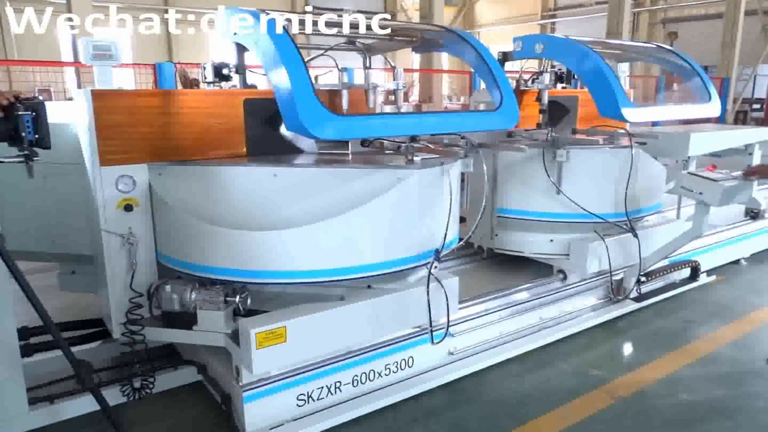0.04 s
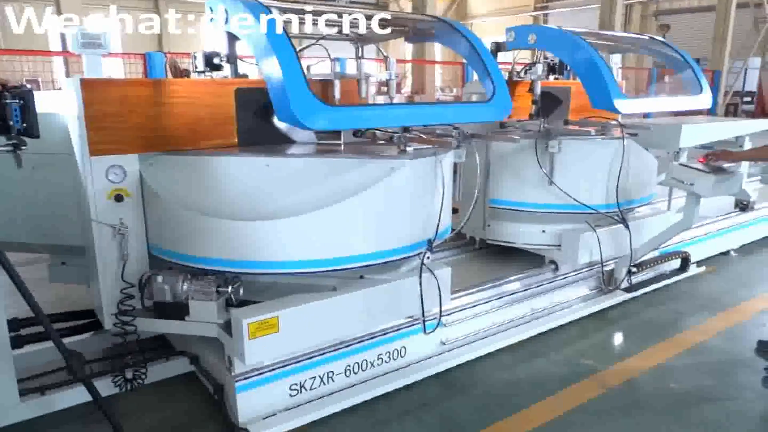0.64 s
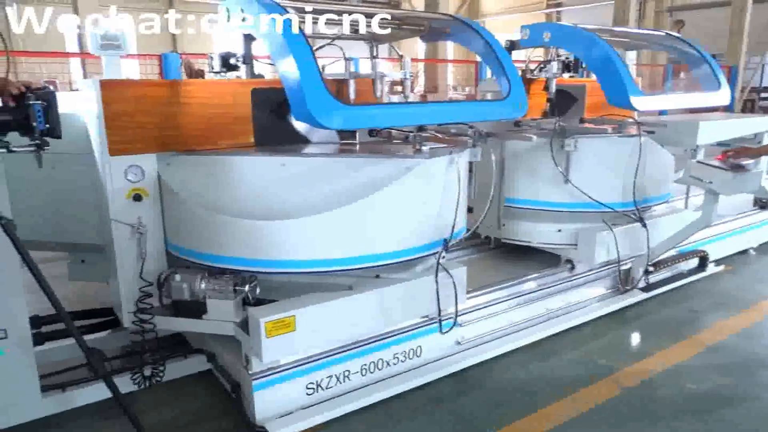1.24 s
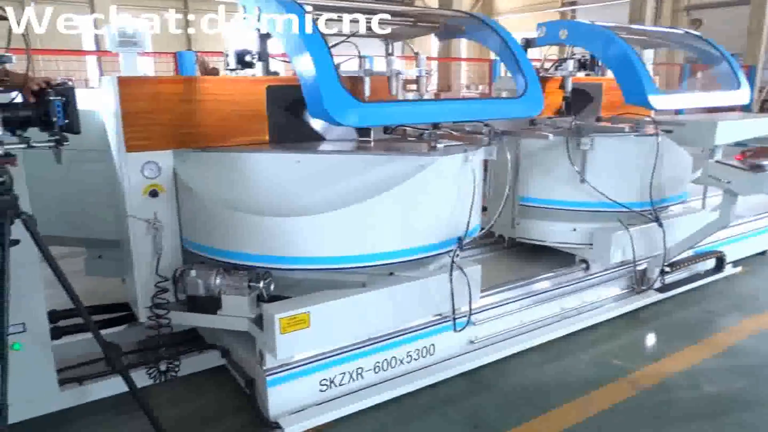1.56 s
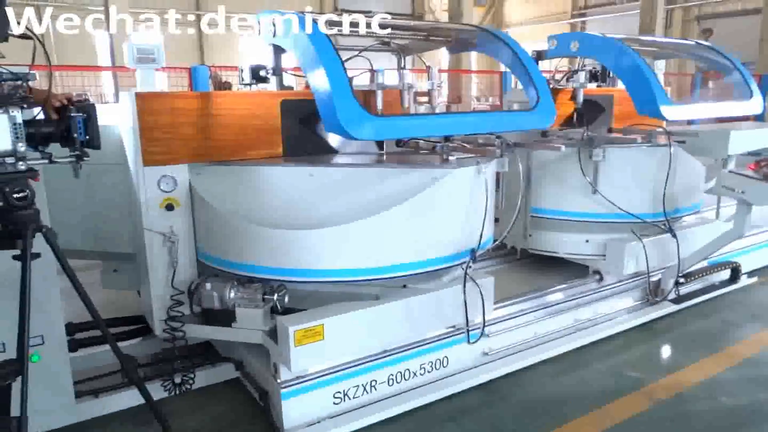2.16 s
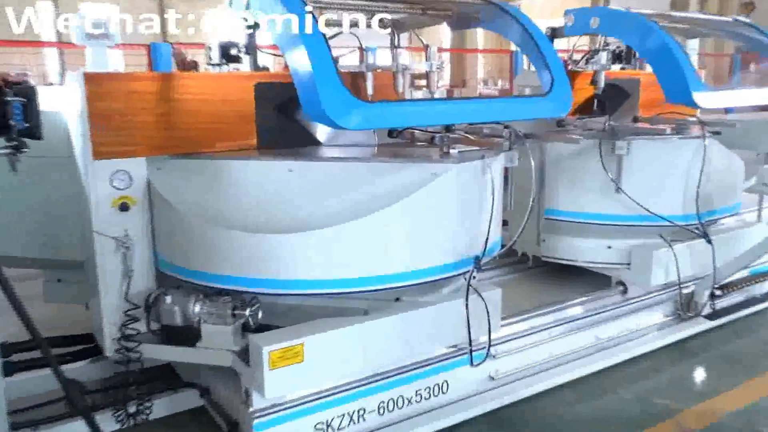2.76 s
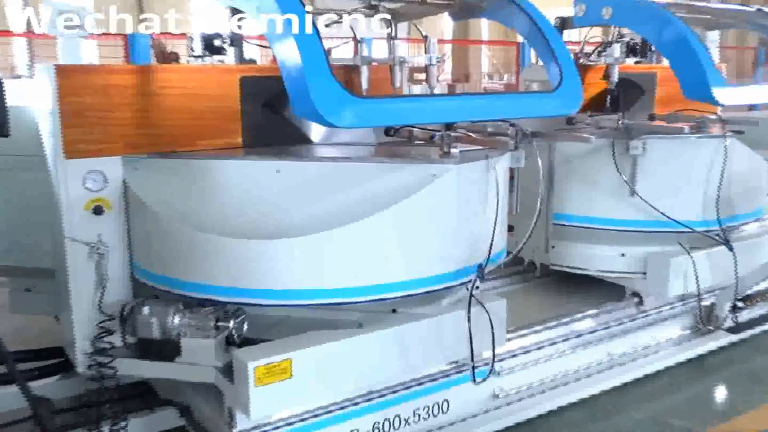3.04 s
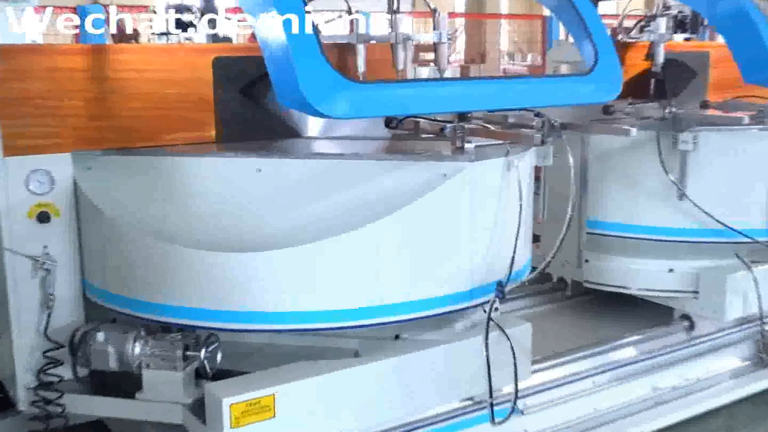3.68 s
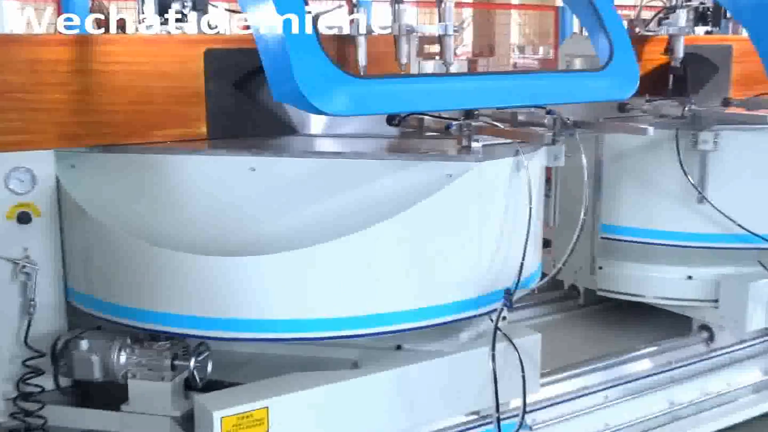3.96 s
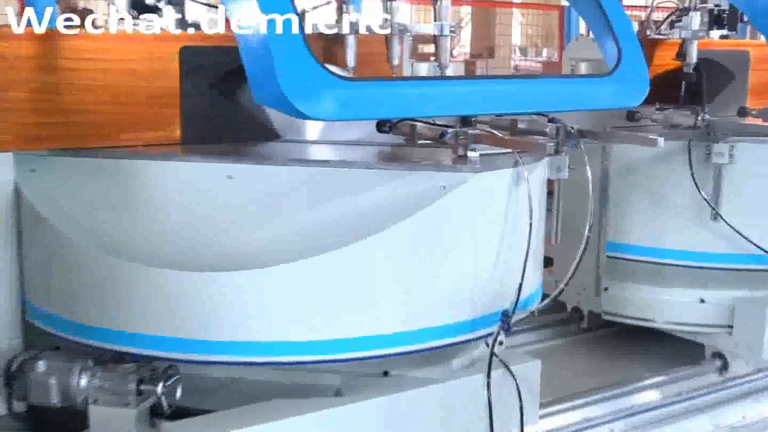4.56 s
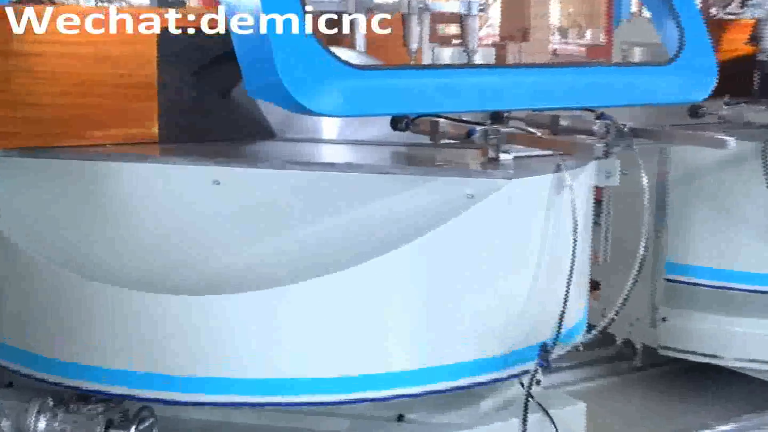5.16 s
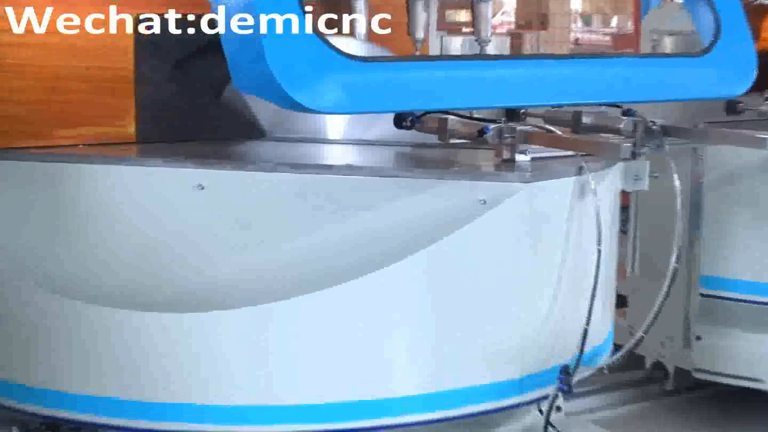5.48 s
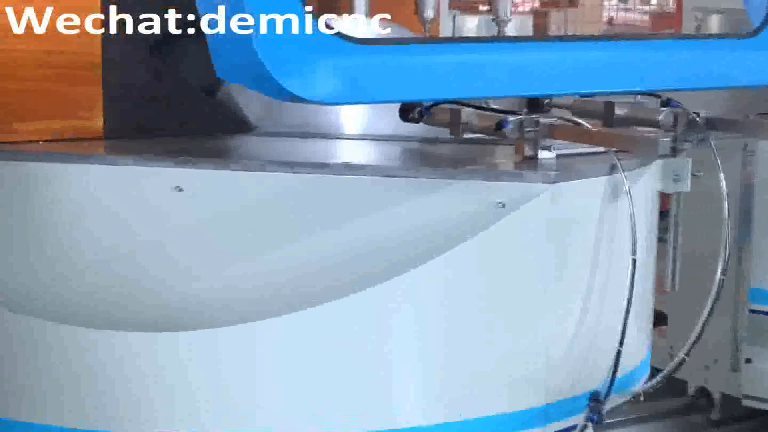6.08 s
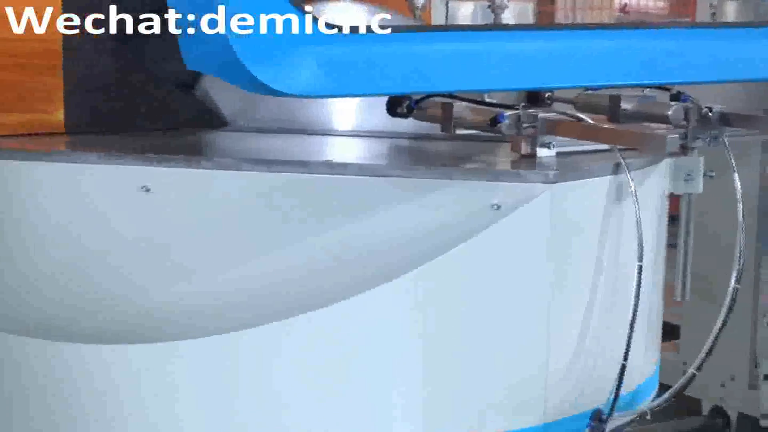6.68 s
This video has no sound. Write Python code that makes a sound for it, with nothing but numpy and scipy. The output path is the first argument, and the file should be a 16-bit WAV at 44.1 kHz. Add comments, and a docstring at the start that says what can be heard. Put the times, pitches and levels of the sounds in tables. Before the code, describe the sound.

A large twin saw cuts metal with a shrill, hissing screech, then keeps whining and whirring in a factory hall.

```python
"""A factory hall: a double-head mitre saw cuts aluminium, then runs free as the listener walks up to it.
Turbulent air rushes from the fans and round the blades, and the motors hum. Two blades whine at their
tooth rates and beat against each other; they slow under load and speed up once clear. In the cut, torn
chips hiss and the profile chatters at its resonances, modulating the whine into a screech.
The hall adds a diffuse reverberant tail."""
import sys
import numpy as np
from scipy import signal
from scipy.fft import rfft, irfft
from scipy.io import wavfile
from scipy.ndimage import map_coordinates

SR = 44100
rng = np.random.default_rng(int(sys.argv[2]) if len(sys.argv) > 2 else 0)


def bounce(signal):
    """Save signal as a 16-bit WAV file at the path given by the first command-line argument."""
    frames = np.transpose(np.atleast_2d(signal))
    limited = np.clip(frames, -1, 1)
    pcm = np.round(limited * 32767).astype(np.int16)
    wavfile.write(sys.argv[1], SR, pcm)


N = 300762

# Levels in the tables are relative: each source adds its own gain.
# Difference between the microphones in the hall: frequency_hz, side_gain_db
SIDE_SPECTRUM = [(60, -28), (110, -16), (200, -24), (380, -13.5), (1290, -15), (2380, -15.5), (4400, -22),
                 (8100, -19.5), (15000, -20)]
# Broad noise surges with the chips in the cut, then grows as the listener nears:
# time_s, low_band_db, high_band_db
NOISE_GAINS = [(0, -8, -4), (.37, -3.5, -1.5), (1.05, -10, -6), (1.6, -4, -2.5), (2.0, -7, -4),
               (2.35, -2, -3.5), (3.2, 1, -0.9), (4.2, 3, 3.5), (5.3, 7, 5.5), (6.3, 10, 9.5),
               (6.55, 11.5, 9.5), (6.82, 15.5, 12.5)]
# Turbulence of the fans: frequency_hz, density_db
FAN_SPECTRUM = [(25, -32), (50, -26), (75, -14.5), (130, -9.5), (185, -3.5), (225, -3.5), (330, 3),
                (480, -5.5), (850, -2), (1300, -6), (2000, -11.5), (4000, -20)]
# Turbulence round the blades: frequency_hz, density_db
RUSH_SPECTRUM = [(600, -14), (1600, -19.5), (2200, -5.5), (2900, 0), (3700, -4.5), (4700, -8.5),
                 (5800, -4.5), (7000, -2), (8300, -4), (10500, -8.5), (13000, -18), (15500, -25)]
# Motor and cabinet tones: pitch_hz, level_db
HUM_TONES = [(97, -27), (182, -11), (403, -20), (455, -36), (554, -12), (759, -18), (1034, -17.5)]
# Brief tones that swell and fade in the noise: peak_s, half_length_s, pitch_hz, level_db
BRIEF_TONES = [(2.38, .17, 196.6, -54), (2.55, 0.48, 274.3, -57.5), (6.6, 0.43, 1035, -47),
               (6.726, 0.082, 392, -40)]
# Hiss of teeth tearing off chips: time_s, level_db
CHIP_LEVELS = [(0.0, -33.5), (0.5, -32.5), (0.51, -33.5), (1.25, -36.5), (1.62, -32.5), (1.92, -40),
               (2.2, -38), (2.55, -41), (2.7, -40)]
# Spectrum of that hiss: frequency_hz, density_db
CHIP_SPECTRUM = [(250, -62), (500.0, -34), (1000.0, -15), (2000.0, -13), (3000.0, -18), (4300.0, -11),
                 (5000.0, -4), (6000.0, -0.5), (7200.0, 2), (8500.0, 1.5), (10000.0, -10), (12000.0, -2),
                 (14000.0, -8.5), (15500, -44)]
# Broad resonance of the profile, stirred by the chips: frequency_hz, density_db
GROWL_SPECTRUM = [(490, -40), (540, -27), (560, 9), (585, -5), (612, -5.5), (650, -10), (710, -23)]
# The profile's resonances shift as the cut deepens: time_s, near_end_hz, far_end_hz
PROFILE_RESONANCES = [(.55, 585.7, 635), (.85, 563.7, 581.4), (1.25, 548.5, 568.8), (1.68, 546.8, 567.3),
                      (1.9, 562, 605), (2.1, 584, 615.3), (2.35, 603.7, 570), (3.5, 604, 556.6)]
# Bursts of chatter, with the whine's two lower and two upper sidebands:
# peak_s, half_length_s, drone_db, octave_db, lower_2_db, lower_1_db, upper_1_db, upper_2_db
CHATTER_BURSTS = [(0.373, 0.14, -50, -45.5, -34.5, -39, -25.5, -39),
                  (0.718, 0.076, -35.5, -45.5, -40, -32.5, -29, -37),
                  (0.835, 0.1, -43, -49, -46, -40, -22.5, -35),
                  (1.116, .13, -37.5, -60, -50, -24, -31, -33.5),
                  (1.361, 0.13, -42.5, -51, -36, -23.5, -26.5, -41),
                  (1.593, 0.12, -36.5, -51, -38, -28, -23.5, -27),
                  (1.894, 0.099, -58, -58, -39.5, -40, -31.5, -42),
                  (2.135, .11, -42, -42.5, -34.5, -34, -30, -30.5),
                  (2.36, 0.1, -36.5, -58, -45, -37, -45, -35)]
# The low drone trembles between bursts and rings out: start_s, end_s, fade_db_per_s, level_db
DRONE_TREMBLE = (1, 3, 10.5, -44)
# Weaker sidebands, against the mean of the main four: tooth_pair_multiple, chatter_multiple, level_db
WEAK_SIDEBANDS = [(2, -3, -37), (2, 3, -47), (2, 5, -19), (3, 1, -14), (4, -3, -31), (4, -2, -6.5),
                  (4, -1, -18), (4, 1, -27), (4, 2, -13)]
# Tooth rate of each head and its sag under load:
# free_hz, entry_sag_hz, cutting_sag_hz, settle_s, breakthrough_sag_hz, clear_s, recover_s
NEAR_HEAD = (6461, 223, 113, .8, 215, 3.05, .44)
FAR_HEAD = (6474, 133, 104, .5, 191, 2.92, .62)
# Whine at 1 to 5 times the tooth-pair rate, before and after the deepest bite and running free:
# near_bite_db, far_bite_db, rise_db_per_s, fade_db_per_s, free_db, high_band_gain_share
WHINE_PARTIALS = [(-56.5, -59, -14, 11, -47, 0.45), (-16, -27.5, -1.5, 0.8, -37, 0.85),
                  (-23.5, -38, 5, 17, -53, 0.51), (-21.5, -29.5, 6.5, 9.5, -54.5, 0.27),
                  (-48, -70, -3, 4.5, -80, .1)]
# The blades squeal on one partial: start_s, end_s, partial_number, near_db, far_db
BLADE_SQUEALS = [(0.305, 0.37, 1, -36, -41), (.68, 0.757, 1, -41.5, -55), (1.078, 1.617, 1, -43.5, -58),
                 (1.507, 1.7, 3, -32.5, -35), (1.786, 2.03, 2, -17, -29.5), (1.99, 2.12, 4, -30.5, -38),
                 (2.48, 2.73, 4, -32.5, -44), (2.635, 2.76, 3, -45, -28.5), (2.635, 2.801, 1, -31, -37),
                 (2.8, 2.945, 3, -34, -40), (2.853, 3.45, 1, -40, -39.5), (4.15, 4.98, 4, -54, -52),
                 (4.481, 4.637, 1, -48, -35.5), (5.2, 5.36, 1, -48, -36), (5.401, 5.54, 1, -47, -31.5),
                 (6.33, 6.82, 4, -50, -51)]

TEETH = 130
HALL_T60_S, CUTOFF_HZ, FLOOR_DB = 1.38, 15700, -120
FAN_DB, RUSH_DB, HUM_DB = -47.5, -35, -51
RUMBLE_FULL_S, RUMBLE_DB = 5.6, -63
RING_HZ, RING_START_S, RING_END_S = 787, 0.43, 2.1
TREMBLE_RISE_DB_PER_S = 52
BITE_S, BREAKTHROUGH_S, BREAKTHROUGH_DRAG_S, CUT_END_S = 0.9, 2.62, 0.28, 2.93
SING_S, SING_RISE_S, SING_GAIN_DB = 4.12, 0.077, 7   # the free blades sing out when nearly up to speed
FIRST_NODE_S, LAST_NODE_S, NODE_SPACING_S, NODE_DB = 4.49, 6, 0.316, 3
WHINE_LOSS_DB = 9   # the strongest screech takes this much from the tooth-rate partial


def from_db(db):
    """Amplitude grows tenfold for every 20 decibels."""
    return 10 ** (np.asarray(db) / 20)


def unit_rms(x):
    """Normalisation to a mean power of 1."""
    return x / np.sqrt(np.mean(x ** 2) + 1e-20)


def clock():
    """Uniform sampling: the time of every sample in seconds."""
    return np.arange(N) / SR


def in_time(rows):
    """Linear interpolation in time, one curve per column."""
    times_s, *columns = np.transpose(rows)
    return [np.interp(clock(), times_s, column) for column in columns]


def held(start, end, rise, fall):
    """Exponential growth and decay about a plateau at 0 dB; times in s, slopes in dB per second."""
    return -rise * np.maximum(start - clock(), 0) - fall * np.maximum(clock() - end, 0)


def swell(peak_s, half_s):
    """A Gaussian envelope, in dB."""
    return -10 * np.log10(np.e) * ((clock() - peak_s) / half_s) ** 2


def power_sum(levels):
    """Incoherent addition: the level in dB of sounds whose powers add."""
    return 10 * np.log10(sum(10 ** (np.maximum(db, FLOOR_DB) / 10) for db in levels))


def drift(corner_hz):
    """Low-passed noise gives a slow random fluctuation of rms 1."""
    step, run_in = 40, 2000
    pole = np.exp(-2 * np.pi * corner_hz * step / SR)
    noise = rng.standard_normal(N // step + run_in + 2)
    slow = signal.lfilter([1], [1, -2 * pole, pole * pole], noise)[run_in:]
    return np.interp(np.arange(N) / step, np.arange(len(slow)), unit_rms(slow))


def cycles(hz):
    """Phase, in cycles, is the integral of frequency."""
    return np.cumsum(hz * np.ones(N)) / SR


def tone(phase):
    """Simple harmonic motion of rms 1 with a random starting phase."""
    return np.sqrt(2) * np.sin(2 * np.pi * (phase + rng.random()))


def each_turn(tooth_phase, points):
    """Rotation makes an uneven pattern round the blade's rim periodic; rms 1."""
    rim_position = (tooth_phase / TEETH) % 1 * points
    pattern = rng.standard_normal(points)
    return unit_rms(map_coordinates(pattern, [rim_position], order=3, mode="grid-wrap"))


def filtered(x, spectrum):
    """Filtering multiplies the spectrum by a gain curve, here falling 12 dB an octave beyond its ends."""
    hz, level_db = np.transpose(spectrum)
    bins_hz = np.maximum(np.arange(N // 2 + 1) * SR / N, 1)
    below = np.minimum(bins_hz / hz[0], 1) ** 2
    above = np.minimum(hz[-1] / bins_hz, 1) ** 2
    gain = from_db(np.interp(np.log(bins_hz), np.log(hz), level_db))
    return irfft(rfft(x) * below * above * gain, N)


def coloured_noise(spectrum):
    """Filtered white noise takes on the filter's spectrum; rms 1."""
    return unit_rms(filtered(rng.standard_normal(N), spectrum))


def hall(x, delay_s):
    """Reverberation: a diffuse field decays exponentially from the first wall echo on."""
    t = np.arange(int(HALL_T60_S * SR)) / SR
    tail = rng.standard_normal(len(t)) * from_db(-60 * t / HALL_T60_S) * (t > delay_s)
    return signal.fftconvolve(x, tail / np.sqrt(np.sum(tail ** 2)))[:N]


def unbalance(tooth_hz):
    """Rotating unbalance forces one vibration a turn, a rumble that grows towards the machine."""
    level_db = RUMBLE_DB + held(RUMBLE_FULL_S, RUMBLE_FULL_S, rise=8, fall=0)
    return from_db(level_db) * (1 + 0.89 * drift(8)) * tone(cycles(tooth_hz) / TEETH)


def air(level_db, spectrum, gust_db):
    """Turbulence radiates broadband noise of slightly uneven strength."""
    return from_db(level_db + gust_db * drift(2.2)) * coloured_noise(spectrum)


def wavering_tone(hz, level_db, waver_db, waver_hz):
    """Slow amplitude and frequency modulation make a tone waver."""
    return from_db(level_db + waver_db * drift(5.9)) * tone(cycles(hz + waver_hz * drift(9.0)))


def brief_tones():
    """Tones swell and fade under Gaussian envelopes; one near 390 Hz flickers in the noise at the end."""
    return sum(wavering_tone(hz, db + swell(peak_s, half_s), waver_db=2, waver_hz=6)
               for peak_s, half_s, hz, db in BRIEF_TONES)


def motors(gain_db):
    """Motor and cabinet tones superpose into a hum."""
    tones = sum(wavering_tone(hz, db, waver_db=4, waver_hz=1.82) for hz, db in HUM_TONES)
    return from_db(HUM_DB + gain_db) * tones


def chips(near_hz, far_hz):
    """Periodic and random noise: each tooth tears its own way, turn after turn, and loose chips hiss."""
    near, far = (each_turn(cycles(hz), points=800) for hz in (near_hz, far_hz))
    loose = rng.standard_normal(N)
    tearing = near + from_db(-2) * far + from_db(-1) * loose
    # the hiss dies away once the teeth leave the metal
    level_db = in_time(CHIP_LEVELS)[0] + 7 + held(0, CHIP_LEVELS[-1][0], rise=0, fall=31)
    return from_db(level_db) * unit_rms(filtered(tearing, CHIP_SPECTRUM))


def ring(tooth_hz):
    """A higher resonance of the machine frame, strongest early in the cut, also modulates the whine."""
    envelope_db = held(RING_START_S, RING_START_S, rise=TREMBLE_RISE_DB_PER_S, fall=4.5)
    envelope_db += held(0, RING_END_S, rise=0, fall=44.3)
    teeth = cycles(tooth_hz)
    swing = cycles(RING_HZ * (1 + 0.0067 * drift(9.3)))
    upper = tone(teeth + swing) + from_db(-14) * tone(teeth + 2 * swing)
    # the sidebands below the whine last as long as the cut
    lower_db = -47.5 + held(0, BREAKTHROUGH_S, rise=0, fall=20)
    lower = from_db(lower_db) * (tone(teeth - swing) + tone(teeth - 2 * swing))
    return from_db(envelope_db) * (from_db(-56) * tone(swing) + from_db(-55) * upper) + lower


def drone(tooth_hz, chatter_hz, drone_db, octave_db, jitter, shake, third_db):
    """One end of the profile vibrates at its resonance, shaken unevenly by every turn of the blade."""
    swing = cycles(chatter_hz * (1 + jitter * drift(20.33)))
    shaking = 1 + shake * (each_turn(cycles(tooth_hz), points=4) + drift(6.3))
    overtones = tone(2 * swing) + from_db(third_db) * tone(3 * swing)
    return shaking * (from_db(drone_db) * tone(swing) + from_db(octave_db) * overtones)


def screech(tooth_hz, chatter_hz, sidebands_db, jitter, runout):
    """Modulation: the profile swings against the teeth, giving sum and difference frequencies."""
    teeth = cycles(tooth_hz)
    swing = cycles(chatter_hz * (1 + jitter * drift(25.3)))
    main = sum(from_db(db) * tone(teeth + k * swing) for k, db in zip((-2, -1, 1, 2), sidebands_db))
    weak = sum(from_db(db) * tone(pairs * teeth / 2 + k * swing) for pairs, k, db in WEAK_SIDEBANDS)
    wobble = 1 + runout * each_turn(teeth, points=10)
    return wobble * (main + from_db(np.mean(sidebands_db, axis=0)) * weak)


def chatter_levels():
    """Powers add: levels in dB of the drone, its octave and the four sidebands of the screech."""
    start_s, end_s, fade, level_db = DRONE_TREMBLE
    tremble_db = level_db + held(start_s, end_s, TREMBLE_RISE_DB_PER_S, fade)
    between_bursts = [tremble_db, tremble_db - 17] + [FLOOR_DB] * 4   # the screech comes only in bursts
    bursts = [np.add.outer(levels, swell(peak_s, half_s)) for peak_s, half_s, *levels in CHATTER_BURSTS]
    return [power_sum(parts) for parts in zip(between_bursts, *bursts)]


def chatter(near_hz, far_hz, drone_db, octave_db, sidebands_db):
    """Cutting excites the profile's resonances: both ends drone and screech, and chips stir a growl."""
    near_end_hz, far_end_hz = in_time(PROFILE_RESONANCES)
    near = drone(near_hz, near_end_hz, drone_db, octave_db, jitter=0.00722, shake=0.18, third_db=-6)
    far = drone(far_hz, far_end_hz, drone_db, octave_db, jitter=0.01105, shake=0.26, third_db=-5.5)
    drones = from_db(-2) * near + from_db(-7.5) * far
    growl = from_db(drone_db - 9) * coloured_noise(GROWL_SPECTRUM)
    near_screech = from_db(0.5) * screech(near_hz, near_end_hz, sidebands_db, jitter=0.006, runout=0.054)
    far_screech = from_db(-8) * screech(far_hz, far_end_hz, sidebands_db, jitter=0.0097, runout=0.47)
    return drones + growl + near_screech + far_screech


def tooth_rate(free_hz, entry_sag_hz, cutting_sag_hz, settle_s, breakthrough_sag_hz, clear_s, recover_s):
    """Load slows a motor: it sags on entry, settles, is dragged down at breakthrough, then recovers."""
    t = clock()
    sag_hz = cutting_sag_hz + (entry_sag_hz - cutting_sag_hz) * np.exp(-t / settle_s)
    sag_hz += (breakthrough_sag_hz - sag_hz) * np.clip((t - BREAKTHROUGH_S) / BREAKTHROUGH_DRAG_S, 0, 1)
    return free_hz - sag_hz * np.exp(-np.maximum(t - clear_s, 0) / recover_s)


def standing_waves():
    """Interference: the whine dips and rises, in dB, as the listener passes nodes at an even pace."""
    t = clock()
    inside = np.clip(np.minimum(t - FIRST_NODE_S, LAST_NODE_S - t) / NODE_SPACING_S + 1, 0, 1)
    return -NODE_DB * inside * np.cos(2 * np.pi * (t - FIRST_NODE_S) / NODE_SPACING_S)


def whine_levels(high_band_db, screech_db):
    """Cutting, free running and squealing add in power: the level in dB of each partial of both blades."""
    near, far = [], []
    release_db = held(0, CUT_END_S, rise=0, fall=144)   # the teeth leave the metal
    sing_onset = np.clip((clock() - SING_S) / SING_RISE_S, 0, 1)
    singing_db = standing_waves() + SING_GAIN_DB * (sing_onset - 1)
    loss_db = WHINE_LOSS_DB * from_db(screech_db - screech_db.max()) ** 2
    for k, (near_db, far_db, rise, fade, free_db, share) in enumerate(WHINE_PARTIALS, 1):
        at_tooth_rate = k == 2
        cutting_db = held(BITE_S, BITE_S, rise, fade) + release_db - loss_db * at_tooth_rate
        running_db = free_db + share * high_band_db + singing_db * at_tooth_rate
        squeals = [np.add.outer(blades_db, held(start, end, rise=350, fall=156))
                   for start, end, partial, *blades_db in BLADE_SQUEALS if partial == k]
        near.append(power_sum([near_db + cutting_db, running_db, *(pair[0] for pair in squeals)]))
        far.append(power_sum([far_db + cutting_db, running_db, *(pair[1] for pair in squeals)]))
    return near, far


def whine(tooth_hz, levels_db, runout, flutter, swell_db):
    """Teeth ground in unlike pairs sound harmonics of half the tooth rate; runout modulates each turn."""
    teeth = cycles(tooth_hz)
    wobble = 1 + runout * each_turn(teeth, points=16) + flutter * drift(58)
    partials = (from_db(db + swell_db * drift(10.2)) * tone(teeth * k / 2)
                for k, db in enumerate(levels_db, 1))
    return wobble * sum(partials)


def scene():
    """Direct sound and the hall's diffuse field superpose at two closely spaced microphones."""
    # the motors hunt slightly, so the beat between the blades is uneven
    near_hz, far_hz = (tooth_rate(*head) + 1.5 * drift(2) for head in (NEAR_HEAD, FAR_HEAD))
    drone_db, octave_db, *sidebands_db = chatter_levels()
    low_band_db, high_band_db = in_time(NOISE_GAINS)
    near_db, far_db = whine_levels(high_band_db, screech_db=sidebands_db[2])
    blades = whine(near_hz, near_db, runout=0.019, flutter=0.065, swell_db=0.65)
    blades += whine(far_hz, far_db, runout=0.27, flutter=0.13, swell_db=2.16)
    profile = chatter(near_hz, far_hz, drone_db, octave_db, sidebands_db) + ring(near_hz)
    hiss = chips(near_hz, far_hz)
    fans = air(FAN_DB + low_band_db, FAN_SPECTRUM, gust_db=1.0)
    rush = air(RUSH_DB + high_band_db, RUSH_SPECTRUM, gust_db=1.01)
    background = fans + rush + motors(low_band_db) + brief_tones() + unbalance(near_hz)
    direct = background + hiss + profile + blades
    # the blades beam their whine forward, so less of it goes round the hall
    reflected = direct - 0.1 * blades
    mid = direct + from_db(-9) * hall(reflected, delay_s=0.016)
    # the microphones hear long waves alike; only the hall's shorter waves differ between them
    side = filtered(hall(reflected, delay_s=0.0017), SIDE_SPECTRUM)
    return np.array([mid + side, mid - side]) * from_db([[-.3], [.3]])


def record(dry):
    """An elliptic low-pass filter cuts the highest treble steeply."""
    return signal.sosfilt(signal.ellip(16, .1, 90, CUTOFF_HZ, fs=SR, output="sos"), dry)


dry = scene()
out = record(dry)
bounce(out)
```